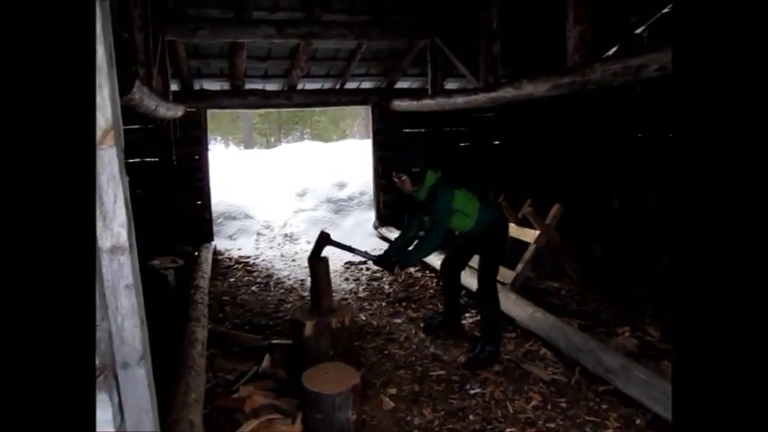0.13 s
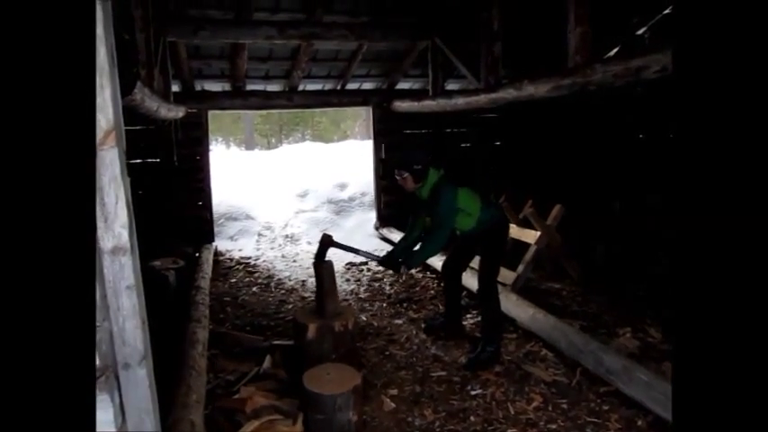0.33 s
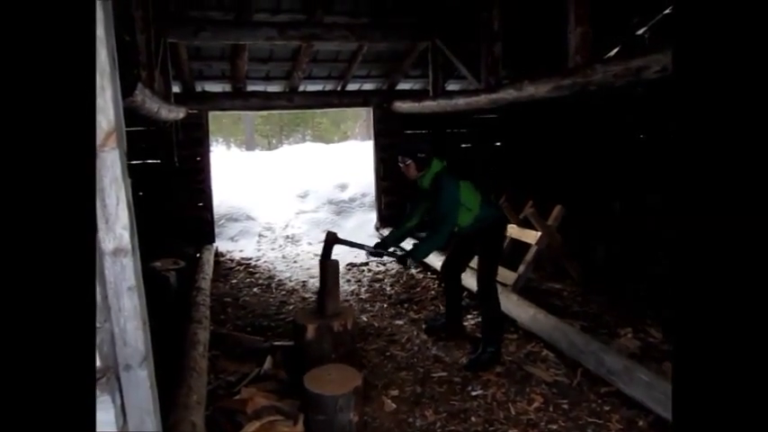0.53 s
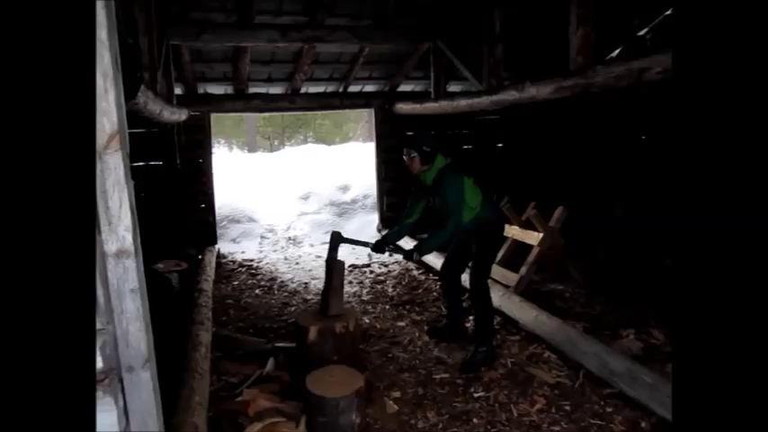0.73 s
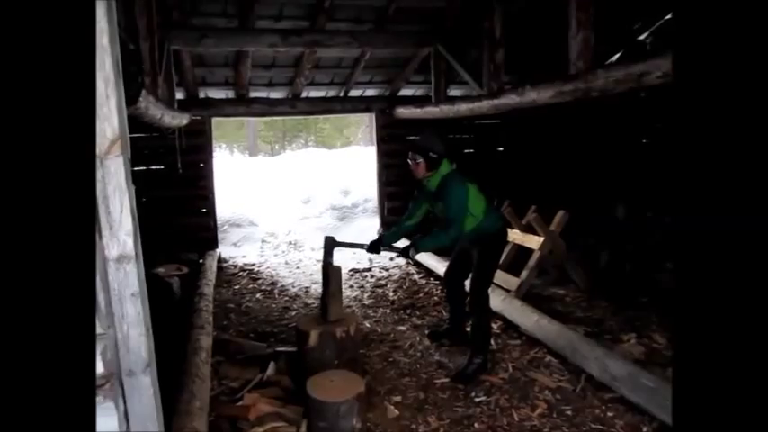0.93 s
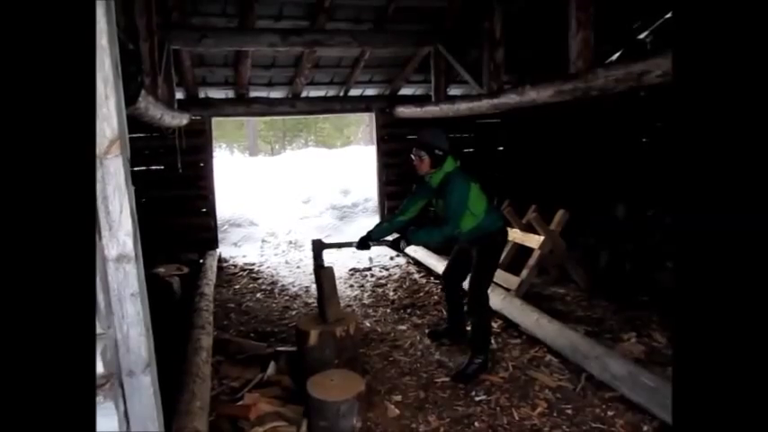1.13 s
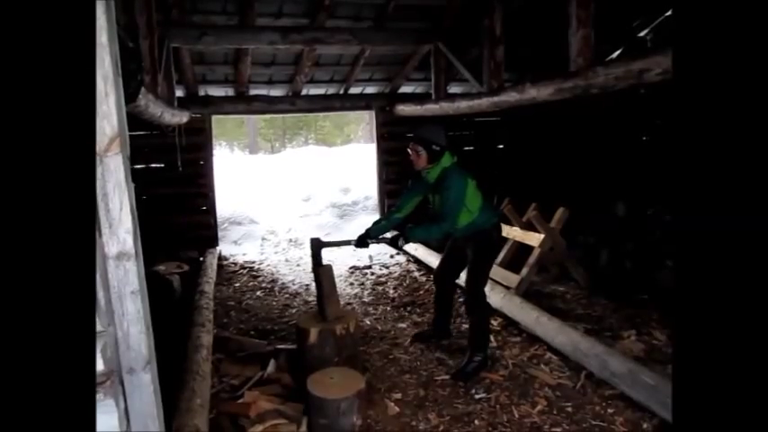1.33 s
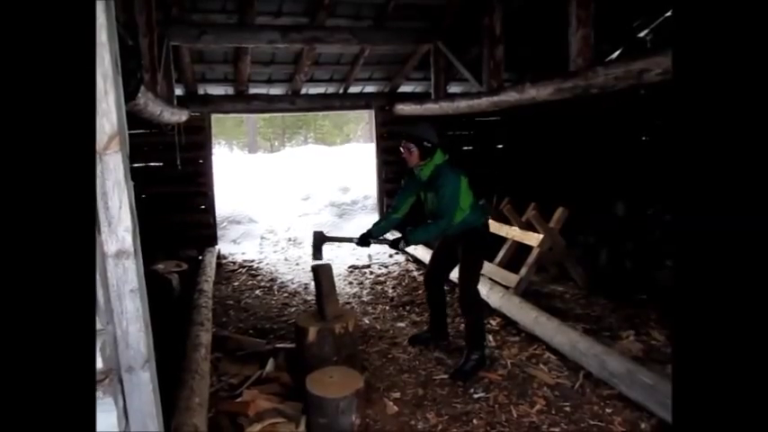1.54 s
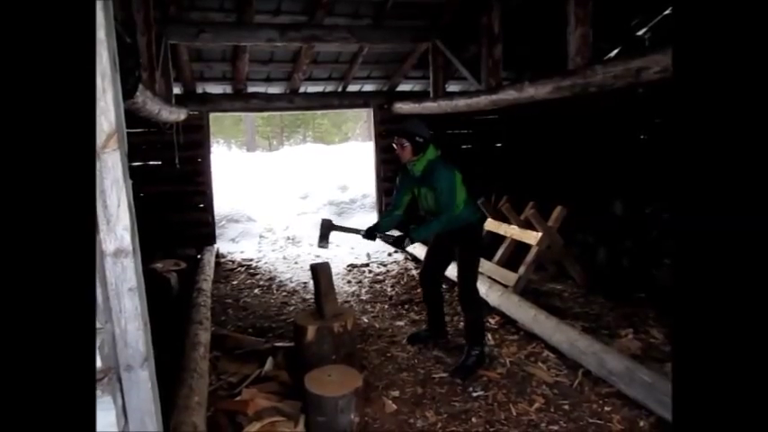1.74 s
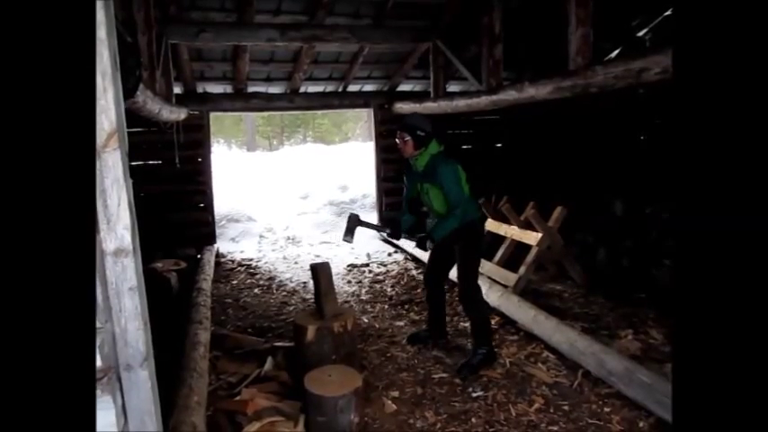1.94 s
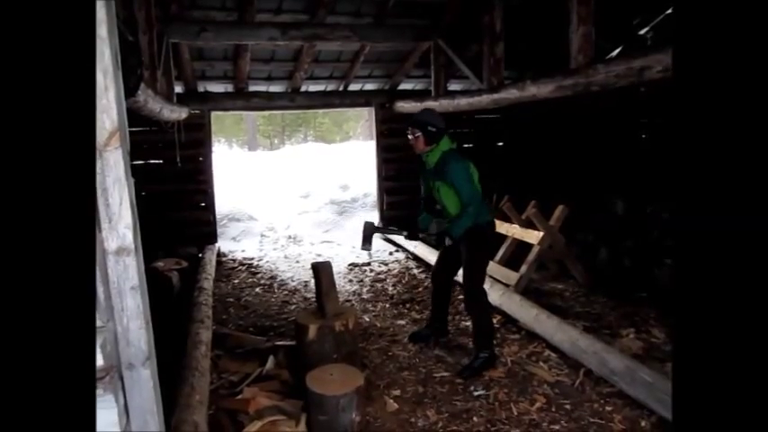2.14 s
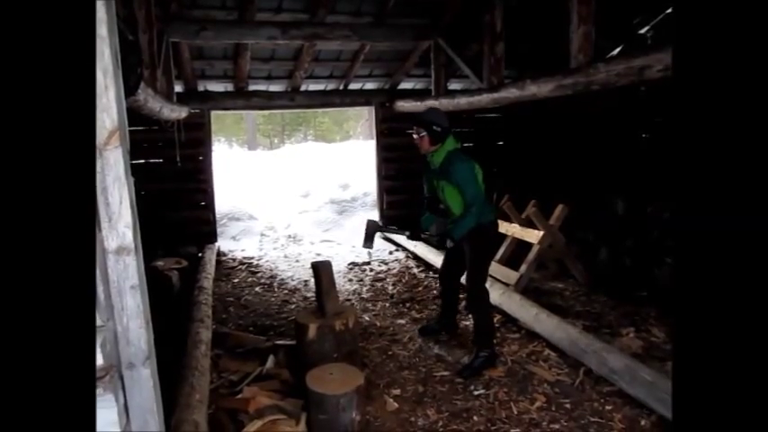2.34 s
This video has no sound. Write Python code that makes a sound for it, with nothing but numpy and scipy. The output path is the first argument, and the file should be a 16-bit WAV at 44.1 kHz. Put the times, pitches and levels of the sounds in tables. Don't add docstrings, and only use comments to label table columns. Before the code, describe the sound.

One sharp, overloaded axe blow into wood in an open shed, followed by faint creaks, ticks and rustling

```python
import sys
import numpy as np
from scipy import signal
from scipy.io import wavfile

SR = 44100
rng = np.random.default_rng(int(sys.argv[2]) if len(sys.argv) > 2 else 0)


def transcribe(u):
    v = np.clip(np.atleast_2d(u).T, -1, 1)
    q = np.round(v * 32767).astype(np.int16)
    wavfile.write(sys.argv[1], SR, q)


def level_to_linear(level):
    exponent = np.asarray(level, float) / 20
    return 10 ** exponent


N = 105840
BLOW_S = 0.078

# pitch in Hz, level in dB per Hz.
AIR_COLOUR = [(50, -13.5), (90, 1), (481, -9.5), (1200, -12), (1360, -14), (3050, -18), (3400, -21),
              (6840, -26), (16000, -34.5)]
# pitch in Hz, width in Hz, level in dB.
MACHINE_HUM = [(950, 180, -53.5), (1210, 16, -60), (830, 100, -63), (1530, 31, -67)]
# time in seconds, level in dB.
WIND_LEVEL = [(0, -39), (0.3, -43.5), (.46, -40), (0.519, -33), (0.581, -43.5), (0.849, -43), (1.1, -54),
              (1.2, -42), (1.42, -55), (1.662, -40), (1.78, -55), (1.928, -45), (1.998, -36), (2.12, -38.5),
              (2.19, -31), (2.27, -45), (2.33, -34.5), (2.4, -47)]
# start in seconds, length in seconds, level in dB.
RUSTLE_STROKES = [(-.03, 0.11, -42), (.42, 0.24, -64.5), (0.618, 0.1, -61.5), (0.861, 0.13, -58),
                  (.98, 0.089, -59.5), (1.191, 0.15, -55.5), (1.47, 0.068, -44), (1.854, 0.162, -49),
                  (1.96, 0.18, -50.5), (2.04, 0.19, -46), (2.187, 0.14, -46), (2.359, 0.15, -41)]
# pitch in Hz, level in dB per Hz.
RUSTLE_COLOUR = [(180, -34), (300, -6.5), (528, -10), (946, -0.5), (1100, -13.5), (2930, -11),
                 (16000, -40.5)]
# start in seconds, length in seconds, level in dB.
SLEEVE_SWEEPS = [
    (2.02, 0.18, -44.5),
    (2.19, .14, -51),
    (2.36, .08, -54.5),
]
# pitch in Hz, level in dB per Hz.
SLEEVE_COLOUR = [(1500, -10.5), (2500, 3), (6000, -4.5), (12500, -14), (16000, -20)]
# start in seconds, peak in dB, pitch in Hz, time to die by 60 dB in seconds.
SPLINTER_TICKS = [(.020, -29, 2880, 0.007), (.0508, -32, 2980, 0.012), (.2831, -55, 3300, 0.019),
                  (.3051, -53, 3460, 0.016), (.338, -60.5, 2780, .03), (.569, -48.5, 8770, 0.017),
                  (.6628, -40, 3680, 0.014), (.6645, -42, 10150, 0.021), (.7515, -42.5, 8500, 0.0047),
                  (.8032, -30, 2990, 0.021), (.879, -44.5, 3920, 0.097), (.932, -44, 12500, 0.022),
                  (1.0544, -42, 13500, .012), (1.075, -45, 9900, 0.008), (1.163, -43, 3500, 0.005),
                  (1.2792, -36, 3260, 0.011), (1.3755, -42, 5200, 0.052), (1.463, -42.5, 3950, 0.019),
                  (1.484, -40, 3270, 0.037), (1.493, -31, 3250, 0.01), (1.501, -45, 2480, .04),
                  (1.534, -41, 8050, 0.0099), (1.79, -42.5, 5600, 0.018), (1.874, -40.5, 3470, 0.018),
                  (1.9235, -33, 2480, 0.018), (2.027, -35.5, 2370, 0.028), (2.0606, -36.5, 4900, 0.016),
                  (2.171, -33.5, 2760, 0.02), (2.375, -58, 4000, 0.011), (2.3869, -29.5, 3700, 0.011),
                  (2.394, -42, 11100, .012)]
# start in
# seconds, peak in dB, pitch in Hz, time to die by 60 dB in seconds.
MORE_TICKS = [(.4343, -60.5, 8990, .01), (.4836, -59, 8000, 0.012), (.640, -48, 3500, .01),
              (.6655, -49, 13340, 0.015), (.6745, -51, 6000, 0.018), (.6942, -53.5, 6440, .012),
              (.741, -55, 3500, 0.009), (.7515, -53.5, 14000, 0.0087), (.881, -55.5, 13150, 0.028),
              (.976, -48.5, 4030, 0.014), (1.025, -50.5, 5100, 0.044), (1.186, -52, 3500, .01),
              (1.322, -55, 14000, .01), (1.33, -47, 6050, .012), (1.341, -50, 13400, .012),
              (1.377, -51, 11000, .015), (1.4195, -47, 7000, 0.024), (1.463, -50, 11000, 0.016),
              (1.4905, -42, 10900, 0.014), (1.4932, -50, 11000, 0.013), (1.523, -54, 11000, .012),
              (1.535, -54, 3800, 0.011), (1.647, -52, 3940, .012), (1.914, -49, 3000, 0.017),
              (1.975, -50, 8500, 0.027), (2.031, -47, 2800, 0.012), (2.077, -48, 13500, .012),
              (2.104, -41, 6000, .015), (2.26, -42, 2950, .02), (2.305, -48, 7500, 0.019),
              (2.377, -45, 6100, 0.016)]
# start in seconds, peak in dB, pitch in Hz,
# time to die by 60 dB in seconds.
FLOOR_BUMPS = [(.279, -45, 95, .09), (.300, -54, 190, .08), (.776, -47, 90, .06), (.880, -48, 110, .05),
               (1.185, -45, 80, .08), (1.494, -39, 90, .03), (1.975, -46, 150, .04), (2.098, -39, 194, .05),
               (2.345, -43, 80, .05)]
# pitch in Hz, level in dB, time to die by 60 dB in seconds.
SQUEAK_TONES = [(2360, -53.5, 0.054), (3350, -60, 0.049), (3730, -61, 0.037)]
# start in seconds, peak in dB, pitch in Hz,
# time to die by 60 dB in seconds.
LEVER_KNOCKS = [(.7775, -50, 800, 0.013), (.8035, -33.5, 950, 0.01), (.8715, -39.5, 700, 0.057),
                (0.8844, -18.5, 1494, 0.008), (.9387, -41, 2230, .006), (.9766, -47.5, 900, 0.0079),
                (1.0771, -25.5, 1510, 0.0073), (1.1616, -36.5, 1530, 0.0086), (1.2220, -33, 1110, 0.021),
                (1.4905, -23.5, 1280, 0.0024), (1.4932, -33, 1330, 0.019), (1.5025, -40, 2250, 0.03),
                (1.6455, -40, 1600, 0.0082), (1.8695, -35.5, 1400, 0.0086), (1.8932, -39, 1560, 0.011),
                (1.9250, -33, 1550, 0.014), (2.0266, -38, 1570, 0.012), (2.1704, -35.5, 865, 0.066),
                (2.1715, -36, 1570, 0.016), (2.3826, -34, 1320, 0.0089)]
KNOCK_RATIOS = [1, .72, 1.6]
KNOCK_LEVELS = [0, -6, -22]
# start in seconds, level in dB, time to die by 60 dB in seconds.
FIBRE_TEARS = [
    (.0768, -19.5, 0.023),
    (.0800, -26, .04),
    (0.091, -44.5, 0.22),
    (.1040, -35, .035),
]
# pitch in Hz, level in dB per Hz.
TEAR_COLOUR = [(3000, -10), (5000, -0.5), (8000, -1), (12000, -9), (16000, -12.5)]
# start in seconds, peak in dB, pitch in Hz, time to die by 60 dB in seconds.
EDGE_BITES = [
    (.0771, 5, 2565, .009),
    (.0793, 5, 2580, 0.0069),
    (.0860, -24, 3000, 0.031),
    (.1042, -13.5, 3400, 0.034),
]
# start in seconds, peak in dB.
LOG_THUDS = [
    (.0776, -15.5),
    (.0797, -1),
    (.0858, -24.5),
    (.1085, -25.5),
    (.1160, -20.5),
    (.1480, -34),
]
# pitch in Hz, level in dB, time to die by 60 dB in seconds.
LOG_TONES = [(104, -7, 0.04), (225.6, -25.5, .05), (385.7, -24, .04), (552.7, -11.5, 0.018),
             (628.6, -3, 0.046), (700, 1, 0.018), (799, -19.5, 0.049), (953, -9.5, 0.033),
             (1245, -17.5, 0.033)]
# pitch in Hz, level in dB, time to die by 60 dB in seconds.
HEAD_TONES = [(2140, -5, 0.015), (2592, 0, 0.019), (3034, -5.5, 0.012), (4090, -6.5, 0.012),
              (4580, -25, 0.032), (5985, -15, 0.023), (6770, -20.5, 0.03), (8580, -23, 0.014)]
# pitch in Hz, level in dB per Hz.
SHED_COLOUR = [(60, -9.5), (320, -8), (480, -14), (640, -5), (850, -9.5), (1300, -20.5), (3300, -24),
               (8770, -29), (16000, -39.5)]
# pitch in Hz, time to die by 60 dB in seconds.
SHED_DECAY = [(60, 0.11), (240, 0.24), (600, 0.24), (1400, 0.15), (3000, 0.21), (8000, 0.082),
              (15000, 0.043)]
# pitch in Hz, level in dB.
WALL_ECHO = [(300, 3), (800, -6), (2000, -4), (5000, -18)]


def rms_one(x):
    return x / np.sqrt(np.mean(x ** 2) + 1e-20)


def at_hz(points, hz):
    pitch, value = np.transpose(points)
    return np.interp(np.log(hz), np.log(pitch), value)


def drift(rate_hz):
    r = np.exp(-80 * np.pi * rate_hz / SR)
    noise = rng.standard_normal(N // 40 + 2002)
    slow = signal.lfilter([1], [1, -2 * r, r * r], noise)[2000:]
    return np.interp(np.arange(N) / 40, np.arange(len(slow)), rms_one(slow))


def since_blow():
    return np.clip(np.arange(N) / SR - BLOW_S, 0, None)


def soften(x, hz):
    return signal.sosfilt(signal.butter(2, hz, fs=SR, output="sos"), x)


def firm(x, hz):
    return signal.sosfilt(signal.butter(2, hz, "high", fs=SR, output="sos"), x)


def band_pass(x, low, high, order=2):
    return signal.sosfilt(signal.butter(order, [low, high], "band", fs=SR, output="sos"), x)


def ring(x, hz, t60):
    r, w = level_to_linear(-60 / (t60 * SR)), 2 * np.pi * hz / SR
    return signal.lfilter([0, np.sin(w)], [1, -2 * r * np.cos(w), r * r], x + 1e-18)


def bands(colour, source, envelope):
    out, total = 0, 0
    edges = 35 * 2 ** np.arange(0, 9.1, 1 / 3)
    for k, (low, high) in enumerate(zip(edges, edges[1:])):
        hz = np.sqrt(low * high)
        band = level_to_linear(at_hz(colour, hz)) * band_pass(source[k % 2], low, high)
        out = out + band * envelope(hz)
        total = total + np.mean(band ** 2)
    return out / np.sqrt(total)


def strokes(rows):
    t = np.arange(N) / SR
    return sum(level_to_linear(db) * np.sin(np.pi * np.clip((t - s) / length, 0, 1)) for s, length, db in rows)


def add(out, s, sound):
    i = int(s * SR)
    out[i:i + len(sound)] += sound[:len(out) - i]


def snaps(rows, width, click=7.4, rise_s=1e-6, order=2):
    out, t = np.zeros(N), np.arange(3000) / SR
    for s, db, hz, t60 in rows:
        noise = rng.standard_normal(3000) * (1 - np.exp(-t / rise_s))
        push = (noise - click * (t == 0)) * level_to_linear(-60 * t / t60)
        burst = band_pass(push, hz / width, min(hz * width, 17000), order)
        add(out, s, level_to_linear(db) * burst / np.abs(burst).max())
    return out


def strike(rows, tones, spread_db):
    out, chance = 0, rng.standard_normal((len(rows), len(tones)))
    hits = [int(row[0] * SR) for row in rows]
    hit_db = np.array([row[1] for row in rows])
    for k, (hz, level_db, t60) in enumerate(tones):
        clicks = np.zeros(N)
        clicks[hits] = level_to_linear(hit_db + level_db + spread_db * chance[:, k])
        out = out + ring(clicks, hz, t60)
    return out


def outdoor_air():
    shared = drift(26)
    noise = rng.standard_normal((2, N))
    return level_to_linear(-48.5) * bands(AIR_COLOUR, noise, lambda hz: level_to_linear(0.45 * shared + 0.61 * drift(31)))


def far_machine():
    out = 0
    for hz, width, db in MACHINE_HUM:
        hum = rms_one(ring(rng.standard_normal(N), hz, 6.6 / width))
        out = out + level_to_linear(db + 0.84 * drift(8)) * hum
    return out


def wind():
    gust = rms_one(band_pass(rng.standard_normal(N + SR), 12, 36.7)[SR:])
    level_db = np.interp(np.arange(N) / SR, *np.transpose(WIND_LEVEL)) + 1.5 * drift(3.3)
    return level_to_linear(level_db) * gust


def gain_db():
    drop_db, fall_s, hold_s, recover_s = -16, 0.03, 0.37, 0.54
    t = since_blow()
    return drop_db * (1 - np.exp(-t / fall_s)) * np.exp(-np.clip(t - hold_s, 0, None) / recover_s)


def background():
    return level_to_linear(gain_db()) * (outdoor_air() + far_machine() + wind())


def jacket():
    grains_per_s, spread_db = 3000, 3
    sizes = level_to_linear(spread_db * np.minimum(rng.exponential(1, (2, N)), 3.5)) * rng.choice([-1, 1], (2, N))
    grains = (rng.random((2, N)) < grains_per_s / SR) * sizes
    shared, white = drift(37), rng.standard_normal((2, N))
    rub = bands(RUSTLE_COLOUR, grains + 0.38 * white, lambda hz: level_to_linear(2.8 * shared + 2.0 * drift(40)))
    sweep = bands(SLEEVE_COLOUR, white[::-1], lambda hz: level_to_linear(0.87 * shared))
    return strokes(RUSTLE_STROKES) * rub + strokes(SLEEVE_SWEEPS) * sweep


def ticks():
    rise_s = 0.00023
    splinters = snaps(SPLINTER_TICKS, 1.45, 6.6, rise_s, order=3)
    return splinters + snaps(MORE_TICKS, 1.36, 1.5, rise_s, order=4)


def bumps():
    return snaps(FLOOR_BUMPS, width=1.64)


def squeak():
    start_s = 0.4627
    return strike([(start_s, -3), (start_s + 0.0066, -5)], SQUEAK_TONES, 1.3)


def knocks():
    tail, tail_s, soft_hz = 0.033, 0.0052, 2150
    out, t = np.zeros(N), np.arange(3000) / SR
    for s, db, hz, t60 in LEVER_KNOCKS:
        scrape = tail * rng.standard_normal(3000) * np.exp(-t / tail_s)
        push = soften((t == 0) + scrape, soft_hz)
        tones = sum(level_to_linear(d) * ring(push, hz * q, t60) for q, d in zip(KNOCK_RATIOS, KNOCK_LEVELS))
        sound = firm(tones, 0.58 * hz)
        add(out, s, -level_to_linear(db) * sound / np.abs(sound).max())
    return out


def tearing():
    t = np.arange(N) / SR
    shape = sum(level_to_linear(db - 60 * np.clip(t - s, 0, None) / t60) * (t > s) for s, db, t60 in FIBRE_TEARS)
    return shape * bands(TEAR_COLOUR, rng.standard_normal((2, N)), lambda hz: level_to_linear(0.7 * drift(150)))


def shed_answer():
    rise_s, echo_s, echo_rise_s = 0.0034, 0.064, 0.008
    t = since_blow()
    rise = 1 - np.exp(-t / rise_s)
    late = 1 - np.exp(-np.clip(t - echo_s, 0, None) / echo_rise_s)

    def envelope(hz):
        dying = level_to_linear(-60 * t / at_hz(SHED_DECAY, hz) + 2.0 * drift(40))
        return (rise + level_to_linear(at_hz(WALL_ECHO, hz)) * late) * dying

    return level_to_linear(-17) * bands(SHED_COLOUR, rng.standard_normal((2, N)), envelope)


def blow():
    bite = level_to_linear(-5.5) * snaps(EDGE_BITES, width=1.2)
    head = level_to_linear(-11.5) * soften(strike(EDGE_BITES, HEAD_TONES, 2.1), 7000)
    log = soften(strike(LOG_THUDS, LOG_TONES, 0.55), 900)
    return firm(bite - head + log + shed_answer(), 75.6)


def scene():
    around = background() + jacket()
    loosening = ticks() + bumps() + squeak() + knocks()
    return (around + loosening + tearing() + blow())[None]


def top_cut(x):
    return signal.sosfilt(signal.butter(12, 16130, fs=SR, output="sos"), x)


def record(dry):
    clipped = np.clip(dry, -0.97, 0.97)
    treble_cut = signal.cheby2(14, 60, 16300, fs=SR, output="sos")
    mix = signal.sosfilt(treble_cut, clipped)
    return top_cut(mix)


dry = scene()
out = record(dry)
transcribe(out)
```